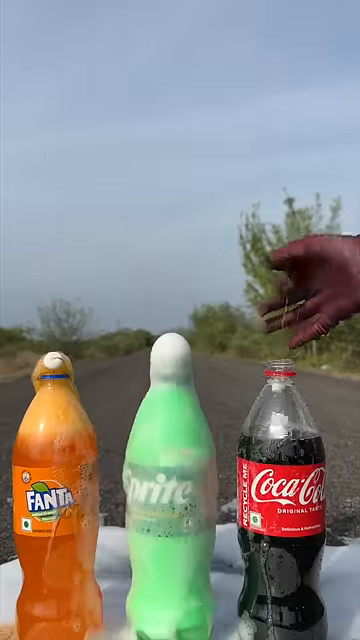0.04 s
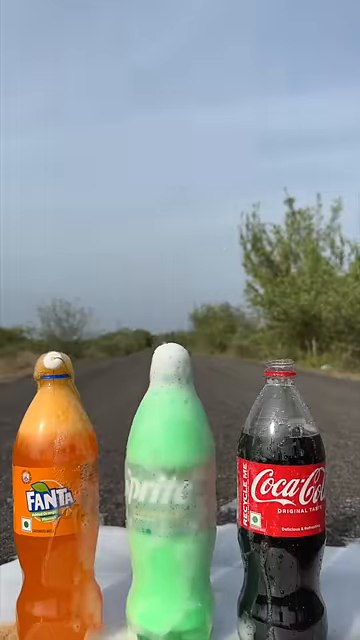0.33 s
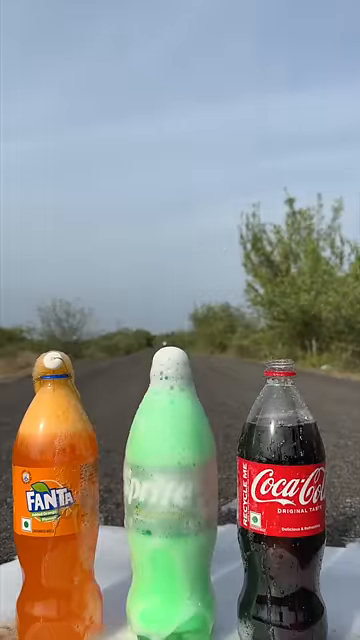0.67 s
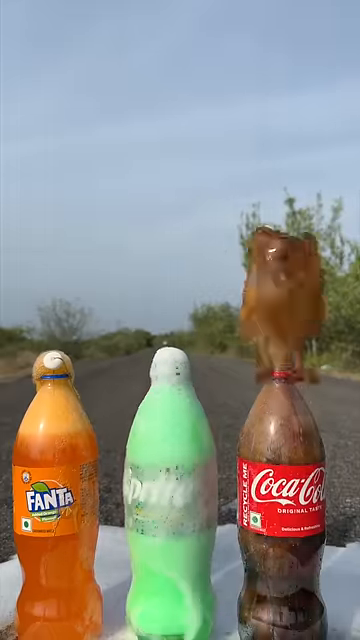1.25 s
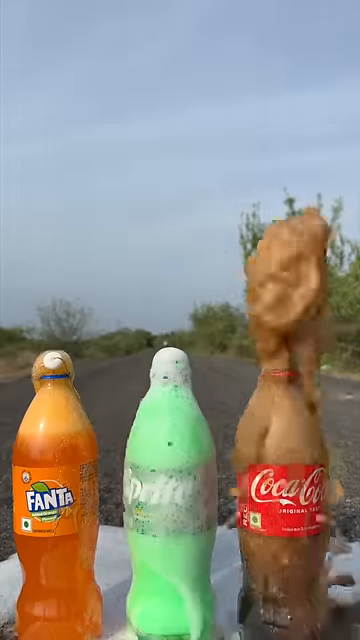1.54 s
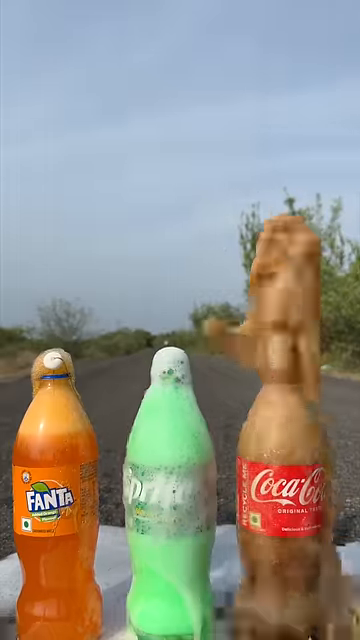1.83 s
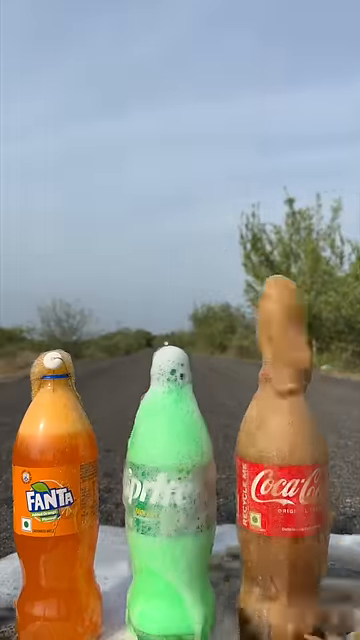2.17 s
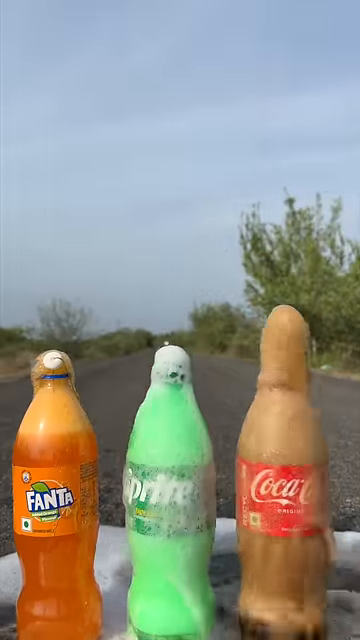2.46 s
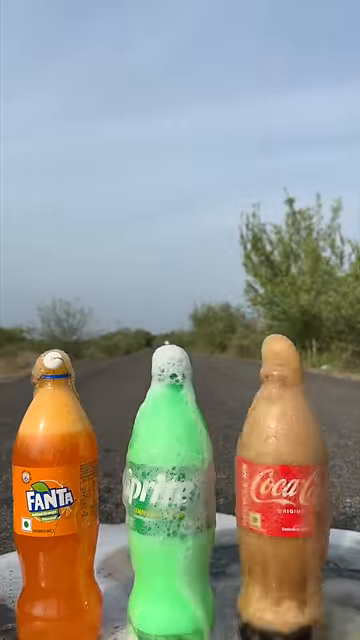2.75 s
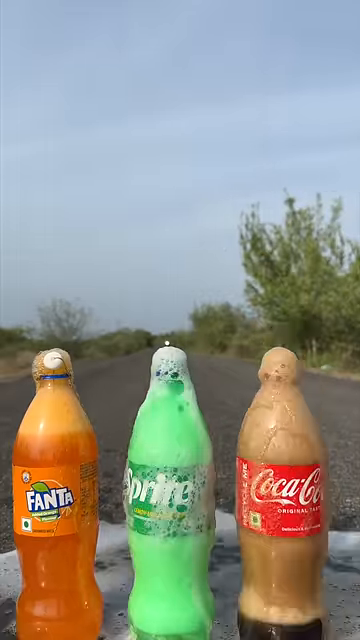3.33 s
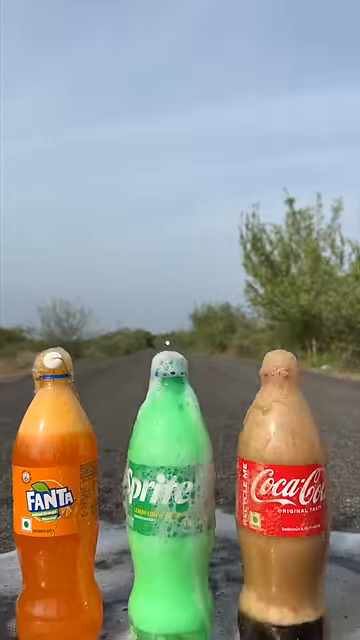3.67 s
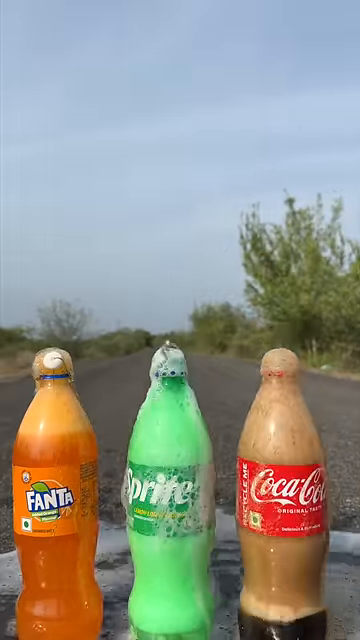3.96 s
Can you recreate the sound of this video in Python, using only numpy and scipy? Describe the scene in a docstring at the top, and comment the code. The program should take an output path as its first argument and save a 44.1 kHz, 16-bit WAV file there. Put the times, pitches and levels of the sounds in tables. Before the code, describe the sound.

Fizzing soda foam gushes out and lands in wet splashes after mints rattle into a plastic bottle with a few gulps. The fizz lingers close by, over outdoor hiss, faint birds, a distant engine and soft wind on the microphone.

```python
"""Soda foam shoots from a plastic bottle and splatters on a country road, then fizzes on.
First, mints strike the neck and set the bottle ringing, and large bubbles gulp inside.
The foam lands as blobs, splashes and fine spray while its tiny bubbles burst.
Small birds call, a far engine drones and a breeze buffets the two ports of a close microphone."""
import sys
import numpy as np
from scipy import signal
from scipy.fft import rfft, irfft, next_fast_len
from scipy.io import wavfile
from scipy.ndimage import uniform_filter1d, map_coordinates

SR = 44100
rng = np.random.default_rng(int(sys.argv[2]) if len(sys.argv) > 2 else 0)


def store_pcm(level_fs):
    """Save levels as 16-bit WAV."""
    pcm = np.round(np.clip(level_fs, -1, 1) * 32767).astype(np.int16)
    wavfile.write(sys.argv[1], SR, np.atleast_2d(pcm).T)


N = 176400
T = np.arange(N) / SR
AGE = T[:SR // 2]  # time since an event's onset, s


def amp(db):
    """Decibels to gain."""
    return 10 ** (np.asarray(db) / 20)


def unit(x):
    """Scale to rms 1."""
    return x / np.sqrt(np.mean(x ** 2) + 1e-20)


def level(rows):
    """Gain per sample from (time_s, level_db) rows."""
    return amp(np.interp(T, *np.transpose(rows)))


def along(points, hz):
    """Interpolate (freq_hz, value) rows on a log frequency axis."""
    freqs, values = np.transpose(points)
    return np.interp(np.log(hz + 1), np.log(freqs + 1), values)


def filtered(x, response):
    """Apply a frequency response."""
    n = x.shape[-1]
    padded = next_fast_len(n + 8192)
    return irfft(rfft(x, padded) * response(np.fft.rfftfreq(padded, 1 / SR)), padded)[..., :n]


def coloured(x, tone):
    """Shape x by (freq_hz, gain_db) rows; rms 1."""
    return unit(filtered(x, lambda hz: amp(along(tone, hz))))


def noise(tone, size=N):
    """Two independent noises with one spectrum."""
    return coloured(rng.standard_normal((2, size)), tone)


def wobble(rate_hz, times=T, knots=1024):
    """Smooth random curve, rate_hz knots a second."""
    return map_coordinates(rng.standard_normal(knots), [times * rate_hz], mode="wrap")


def add(track, start_s, sound):
    """Mix a sound in at start_s."""
    i = max(round(start_s * SR), 0)
    track[..., i:i + sound.shape[-1]] += sound[..., :N - i]


def ring(hz, t60_s, waver_rad=0):
    """One decaying mode, with optional random phase flutter."""
    phase = waver_rad * wobble(70, AGE, knots=64) if waver_rad else 0
    return np.sin(2 * np.pi * hz * AGE + phase) * 1000 ** (-AGE / t60_s)


def glide(hz):
    """Sine following a pitch curve."""
    return np.sin(2 * np.pi * np.cumsum(hz) / SR)


def burst(peak_s):
    """Envelope that swells to 1 at peak_s and dies."""
    return AGE / peak_s * np.exp(1 - AGE / peak_s)


def patter(rate_hz, spread_db, peak_s):
    """Envelope of many tiny random bursts summed in power; rms 1."""
    sizes = amp(spread_db * np.minimum(rng.exponential(size=N), 3.5))
    hits = sizes * (rng.random(N) < rate_hz / SR)
    power = signal.fftconvolve(hits ** 2, burst(peak_s))[:N]
    return unit(np.sqrt(np.abs(power)))


def reflected(x, t60_s, wet_db):
    """A sound plus weak reflections from the surroundings, as mid and side."""
    tail = rng.standard_normal((2, len(AGE))) * 1000 ** (-AGE / t60_s)
    wet = signal.fftconvolve(x[None], tail / np.linalg.norm(tail[0]), axes=1)[:, :N]
    return np.array([x, 0 * x]) + amp(wet_db) * wet


# modes of the bottle and its air: pitch_hz, gain_db, t60_s
BOTTLE_MODES = [(351, -6, 0.2), (432.5, -6.5, 0.35), (700, -2.5, 0.064), (1202, -2.5, 0.055)]
# click of mint on plastic: freq_hz, gain_db
CRACK_TONE = [(200, -21), (700, -2.5), (1500, 1.5), (3300, 4.5), (4100, -2.5), (6200, -5.5), (9000, -19.5),
              (16000, -13)]
# strikes on the neck: start_s, level_db, ring_hz, t60_s, crack_gain_db, bottle_gain_db
MINT_STRIKES = [(.001, -30, 1280, 0.085, 2.5, -1), (0.0272, -22, 2215, 0.032, 4, -14),
                (0.0412, -13, 3140, 0.01, -1.5, -18.5), (.056, -33, 4600, 0.037, -12, -7),
                (0.0916, -30, 2920, 0.041, 5.5, 0), (0.118, -24, 3015, 0.024, -26, -36)]

def mints():
    """Each mint cracks on the neck and rings the bottle, which wavers as the drink sloshes."""
    out = np.zeros(N)
    for start_s, db, hz, t60_s, crack_db, bottle_db in MINT_STRIKES:
        bottle = sum(amp(mode_db) * ring(mode_hz, mode_t60_s, waver_rad=1.4)
                     for mode_hz, mode_db, mode_t60_s in BOTTLE_MODES)
        click = noise(CRACK_TONE, len(AGE))[0] * burst(peak_s=0.00099)
        neck = amp(-11.5) * ring(hz=1580, t60_s=0.023)
        strike = ring(hz, t60_s) + amp(crack_db) * (click + neck) + amp(bottle_db) * bottle
        add(out, start_s, amp(db) * strike)
    return reflected(out, t60_s=0.06, wet_db=-13)


# hiss envelope: time_s, level_db
AIR_LEVEL = [(0, -46), (.7, -48.5), (1.2, -50.5), (2.5, -51.5), (4, -56)]
# hiss spectrum: freq_hz, gain_db
AIR_TONE = [(100, 10.5), (300, -2), (700, -1.5), (1400, -0.5), (2000, 0), (2700, 4.5), (4000, -4.5),
            (5500, -10.5), (16000, -13)]

def open_air():
    """Outdoor hiss, slowly fading."""
    return level(AIR_LEVEL) * noise(AIR_TONE)


# engine tones: pitch_hz, level_db
ENGINE_TONES = [(68, -52), (199, -60.5)]
# rumble spectrum: freq_hz, gain_db
RUMBLE_TONE = [(24, -36), (45, 5), (68, -3), (210, -11.5), (300, -25.5), (1500, -38)]

def far_engine():
    """Two low tones drift in level and phase over a rumble."""
    drone = np.zeros(N)
    for hz, db in ENGINE_TONES:
        gain = amp(db + 2.0 * wobble(9.2))
        drone += gain * unit(np.sin(2 * np.pi * hz * T + 0.43 * wobble(5.6)))
    return np.array([drone, 0 * drone]) + amp(-55.5) * noise(RUMBLE_TONE)


# buffeting spectrum: freq_hz, gain_db
BREEZE_TONE = [(22, -38), (40, 4.5), (85, 8), (160, -8.5), (300, -27.5), (2000, -71)]
# gusts: centre_s, length_s, level_db
GUSTS = [(1.256, 0.033, -39.5), (2.14, 0.14, -42), (2.326, 0.064, -43), (2.53, 0.16, -47),
         (2.72, 0.11, -43), (2.882, .08, -37.5), (2.974, .05, -39.5), (3.29, 0.018, -34),
         (3.308, 0.29, -39.5), (3.682, 0.086, -39), (3.762, 0.021, -31.5), (3.802, 0.042, -26.5)]

def breeze(calm_db=-58, right_gain_db=2.5):
    """Soft gusts buffet the two ports, partly in antiphase."""
    gusts = sum(amp(db) * np.exp(-(2 * (T - centre_s) / length_s) ** 2)
                for centre_s, length_s, db in GUSTS)
    eddies = noise(BREEZE_TONE)
    eddies = eddies - 0.19 * eddies[::-1]  # inverted share of the other port
    local_power = np.abs(uniform_filter1d(eddies ** 2, size=1500))
    steady = unit(eddies / np.sqrt(local_power + 0.05))
    return (amp(calm_db) + gusts) * steady * amp([[0], [right_gain_db]])


# large bubbles in the bottle: start_s, level_db, pitch_hz, t60_s
GULPS = [(.093, -29.5, 410, 0.056), (.129, -39, 637, 0.12), (.184, -38, 425, 0.19), (.52, -34, 441, 0.09),
         (.771, -45, 565, 0.058), (.868, -33.5, 980, 0.026)]

def bubbles(rise_per_s=0.72):
    """Each large bubble rings unsteadily and rises slightly in pitch."""
    out = np.zeros(N)
    for start_s, db, hz, t60_s in GULPS:
        gulp = ring(hz * (1 + rise_per_s * AGE / 2), t60_s, waver_rad=0.7)
        add(out, start_s, amp(db) * gulp)
    return reflected(out, t60_s=0.22, wet_db=-6.5)


# bird whistles: start_s, length_s, level_db, rise_hz
WHISTLES = [(0.441, .39, -51, 523), (1.02, 0.16, -55, 0)]
# bird chirps: start_s, length_s, level_db, start_hz, middle_hz, end_hz
CHIRPS = [(2.842, .022, -46, 5300, 5600, 6050), (2.906, 0.05, -45, 5900, 4700, 3670),
          (3.017, 0.056, -46, 5450, 4650, 3170), (3.09, 0.036, -45.5, 3010, 3950, 3820),
          (3.262, 0.04, -48, 5120, 4400, 3420), (3.41, 0.055, -49.5, 3450, 4300, 5540)]

def birds(whistle_hz=7050, warble_hz=413, warble_depth=0.021, flutter_db=1.5):
    """One bird holds thin notes, the first lifting at its end; another sweeps warbling chirps."""
    out = np.zeros(N)
    for start_s, length_s, db, rise_hz in WHISTLES:
        progress = np.linspace(0, 1, int(length_s * SR))
        lift = np.interp(progress, [0.46, 1], [0, 1]) ** 1.4
        envelope = np.abs(np.sin(np.pi * progress ** 1.6)) ** 0.33
        add(out, start_s, amp(db) * envelope * glide(whistle_hz + rise_hz * lift))
    for start_s, length_s, db, *pitches_hz in CHIRPS:
        n = int(length_s * SR)
        progress = np.linspace(0, 1, n)
        sweep_hz = np.polyval(np.polyfit([0, 0.5, 1], pitches_hz, 2), progress)
        warble = 1 + warble_depth * wobble(warble_hz)[:n]
        gain = amp(db + flutter_db * wobble(warble_hz)[:n])
        envelope = np.abs(np.sin(np.pi * progress)) ** 0.5
        add(out, start_s, gain * envelope * glide(sweep_hz * warble))
    return reflected(out, t60_s=0.2, wet_db=-6)


# heavy foam blobs landing: start_s, level_db, attack_s
FOAM_BLOBS = [(0.5003, -27, 0.0018), (.511, -26, 0.0028), (1.7015, -25, .0011), (1.748, -31, 0.00061),
              (2.322, -37.5, 0.0012), (2.485, -31.5, 0.00078), (2.823, -47, 0.0024), (2.832, -40, 0.00069),
              (2.862, -43, 0.0014), (2.966, -47, 0.0017)]

def blobs(start_hz=2250, end_hz=340, fall_s=0.001916):
    """A blob's pitch drops as it spreads on the ground."""
    out = np.zeros(N)
    plop = glide(end_hz + (start_hz - end_hz) * np.exp(-AGE / fall_s))
    for start_s, db, attack_s in FOAM_BLOBS:
        squelch = noise([(500, -1), (1700, -17), (12000, -40)], len(AGE))[0]
        add(out, start_s, amp(db) * np.sqrt(burst(attack_s)) * (plop + 0.3 * squelch))
    return reflected(out, t60_s=0.08, wet_db=-14)


def drops(rate_hz=400, centre_hz=2370, span_octaves=2.6, span_db=14, decay_cycles=1.32):
    """Distinct drops in the spray, each ringing a few cycles at its own pitch."""
    out = np.zeros(N)
    for when, pitch, size in rng.random((round(rate_hz * N / SR), 3)):
        hz = centre_hz * 2 ** (span_octaves * (pitch - 0.5))
        cycles = hz * AGE[:SR // 50]
        tick = np.sin(2 * np.pi * cycles) * np.exp(-cycles / decay_cycles)
        add(out, when * N / SR, amp(span_db * size) * tick)
    return np.array([unit(out), 0 * out])


# spray envelope: time_s, level_db
SPRAY_LEVEL = [(1.15, -59.5), (1.4, -51), (1.5, -42), (1.6, -49), (1.75, -43), (1.86, -42), (1.93, -48),
               (2.15, -48.5), (2.65, -59.5), (2.85, -54), (3.1, -82)]
# spray spectrum: freq_hz, gain_db
SPRAY_TONE = [(150, -25), (400, -2), (1200, -3.5), (2500, 1), (5000, -9.5), (6500, -5), (12000, -9.5),
              (16000, -52)]

def spray():
    """Droplets rain from the foam column and fade as it sinks."""
    droplets = noise(SPRAY_TONE) * patter(rate_hz=1200, spread_db=-3, peak_s=0.00061)
    return level(SPRAY_LEVEL) * (droplets + amp(-1.5) * drops())


# fizz envelope: time_s, level_db
FIZZ_LEVEL = [(1.15, -43), (1.55, -39), (3, -39.5), (4, -42.5)]
# fizz spectrum: freq_hz, gain_db
FIZZ_TONE = [(200, 2), (1000, -15.5), (2600, -5.5), (7200, 0.5), (11300, -2), (16000, 6)]

def fizz():
    """Thousands of tiny bubbles burst in the foam."""
    pops = rng.standard_normal((2, N)) * patter(rate_hz=9700, spread_db=0, peak_s=0.0001)
    return level(FIZZ_LEVEL) * coloured(pops, FIZZ_TONE)


# splashes on the ground: start_s, relative_level_db, relative_treble_db
SPLASHES = [(1.359, -31.5, -8), (1.447, -44, 4), (1.4593, -27.5, -6), (1.5, -18.5, -24),
            (1.5678, -24.5, -20), (1.572, -21.5, -6), (1.617, -28.5, -5), (1.624, -26.5, -17),
            (1.647, -26, -12), (1.664, -33, 0.5), (1.7005, -18, -24), (1.734, -22, -16), (1.759, -28, -25),
            (1.772, -25.5, -32), (1.81, -25, -2), (1.816, -21, -17), (1.853, -27, -22), (1.992, -23, -34),
            (2.157, -26, -4.5), (2.199, -26.5, -14), (2.349, -26.5, -36)]

def splashes(gain_db=-8, weight_db=-5, spit_db=18):
    """Each splash is a wet slap with low weight and bright spit, trailed by scattered droplets."""
    out = np.zeros((2, N))
    droplet_tail = amp(-15) * burst(peak_s=0.0081)
    envelope = burst(peak_s=0.0016) ** 2 + droplet_tail
    slap_tone = [(300, -6), (1200, -1), (2500, 5.5), (4800, -8), (7000, -1.5), (12000, -13)]
    for start_s, db, treble_db in SPLASHES:
        slap = noise(slap_tone, len(AGE))
        weight = noise([(300, -11), (1000, -7.5), (5000, -15)], len(AGE))
        spit = noise([(2000, -22), (7000, -2.5), (12000, 9.5)], len(AGE))
        splash = slap + amp(weight_db) * weight + amp(treble_db + spit_db) * spit
        add(out, start_s, amp(db + gain_db) * envelope * splash)
    return out


BAND_LIMIT_HZ = 15800
# left-right relation: freq_hz, likeness, left_lead_rad
STEREO_RESPONSE = [(202, 0.98, 0.4), (695, 0.25, 0.2), (1700, 1, 0.24), (2750, 0.9, 0.98),
                   (4200, 0.63, -0.06), (5300, 0.05, 1.83), (6570, 0.64, -1.5), (8950, 0.39, -2)]

def stereo_image(mid_side):
    """Stereo width and phase by frequency; 10.6 to 14 kHz is opposite in left and right, very wide."""
    wide_treble = [(10615, 1, -np.pi), (13950, 1, -np.pi)]
    band_edge = [(BAND_LIMIT_HZ, 0.48, -3.5)]
    freqs, likeness, lead_rad = np.transpose(STEREO_RESPONSE + wide_treble + band_edge)

    def width(hz):
        angle = np.arccos(np.clip(along(np.c_[freqs, likeness], hz), 0, 0.998)) / 2
        return np.array([np.cos(angle), np.sin(angle)])

    def phase_shift(hz):
        return np.exp(0.5j * np.outer([1, -1], along(np.c_[freqs, lead_rad], hz)))

    mid, side = filtered(mid_side, width)
    return filtered(np.array([mid + side, mid - side]), phase_shift)


def scene():
    """Soda and surroundings spread in stereo, plus the breeze."""
    soda = mints() + bubbles() + blobs() + splashes() + spray() + fizz()
    surroundings = birds() + open_air() + far_engine()
    return stereo_image(soda + surroundings) + breeze()


def record(dry):
    """Band-pass from 20 Hz to the band limit."""
    return filtered(dry, lambda hz: (hz > 20) * (hz < BAND_LIMIT_HZ))


dry = scene()
out = record(dry)
store_pcm(out)
```